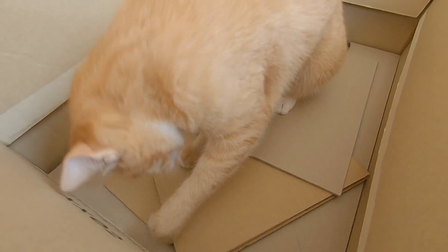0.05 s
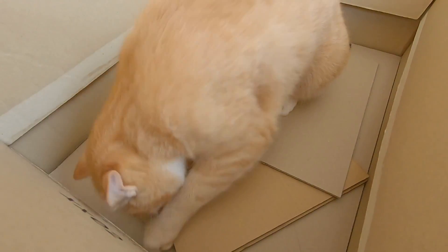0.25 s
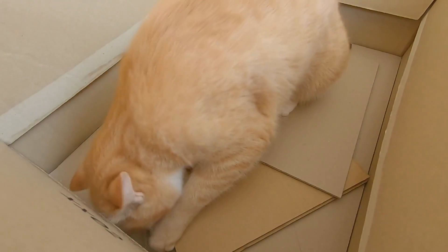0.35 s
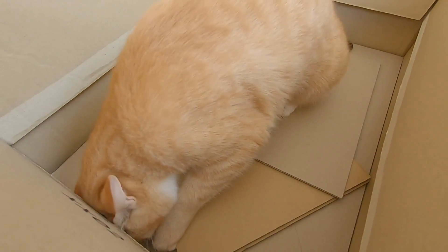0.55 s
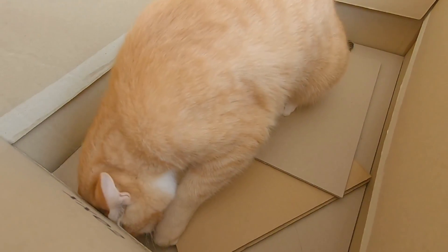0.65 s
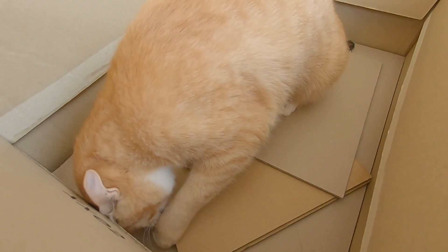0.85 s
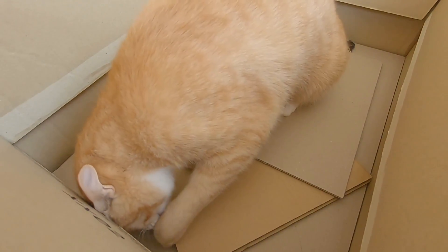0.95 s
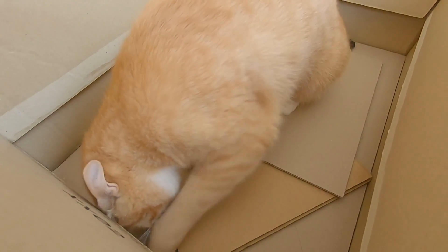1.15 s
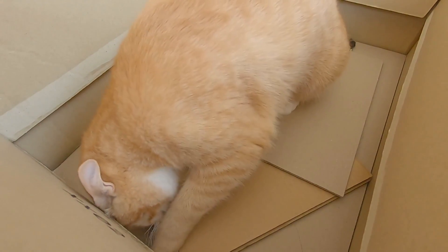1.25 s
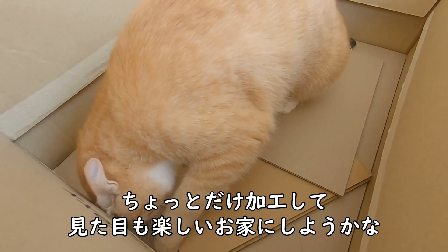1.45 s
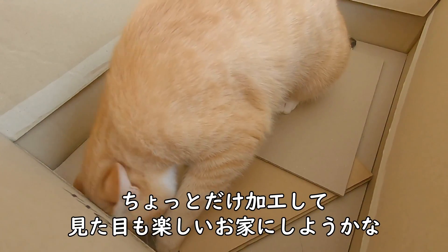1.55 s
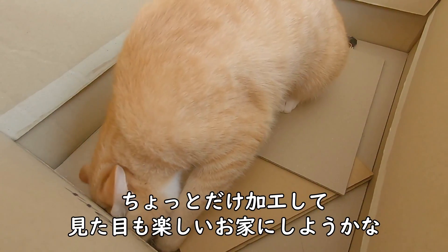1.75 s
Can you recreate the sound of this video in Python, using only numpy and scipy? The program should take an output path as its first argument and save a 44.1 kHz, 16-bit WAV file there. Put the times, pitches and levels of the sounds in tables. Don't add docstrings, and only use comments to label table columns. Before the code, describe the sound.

Cat claws and paws knock on loose cardboard in a box, close and dry with a short room tail. Faint low hum and murmur open; at 0.2 s a loud crisp clack lands with a deep soft thump and brief scuff. Small taps follow at 0.43 and 0.8 s, firmer clicks at 1.02 to 1.13 s, a softer knock at 1.34 s, then faint ticks and soft fur brushing until 1.8 s.

```python
import sys
import numpy as np
from scipy import signal
from scipy.fft import rfft, irfft, next_fast_len
from scipy.io import wavfile

SR = 44100
rng = np.random.default_rng(int(sys.argv[2]) if len(sys.argv) > 2 else 0)


def voltage_ratio(level):
    return 10 ** (np.asarray(level, float) / 20)


def unload_audio(sound):
    columns = np.transpose(np.atleast_2d(sound))
    steps = np.round(np.clip(columns, -1, 1) * 32767)
    wavfile.write(sys.argv[1], SR, steps.astype(np.int16))


N = 79380

# time_s, housing_shake_db, upper_order_buzz_db
MOTOR_CURVE = [(0, -47, -68), (.055, -83, -52), (.09, -56, -59), (.14, -49.5, -55.5), (.2, -59.5, -59.5),
               (.5, -65.5, -70.5), (.9, -91.5, -70.5), (1.15, -52.5, -66.5), (1.38, -71, -67),
               (1.56, -58.5, -59), (1.66, -49.5, -68.5), (1.8, -52.5, -59)]
# multiple, level_db
MOTOR_ORDERS = [(1, -9), (2, -0.5), (3, -3), (4, -8), (5, -15), (6, -9.5), (7, -7), (8, -9), (9, -16)]
# frequency_hz, density_db (per Hz)
MURMUR_COLOUR = [(20, 5), (45, 2), (70, -8), (200, -2), (400, -14), (830, -12), (1100, -26), (3000, -40)]
# time_s, level_db
MURMUR_CURVE = [(0.0, -62.5), (0.15, -64), (0.23, -54.5), (0.52, -63.5), (0.802, -61.5), (0.952, -60.5),
                (1.342, -61.5), (1.568, -58), (1.8, -57)]
# time_s, level_db
FUR_CURVE = [(0, -68.5), (.03, -90.5), (.12, -80), (.33, -87.5), (.45, -89), (.58, -71), (.67, -75),
             (.715, -81), (.8, -70), (.95, -73), (1.25, -78.5), (1.44, -77.5), (1.6, -78), (1.675, -70.5),
             (1.72, -68.5), (1.77, -59), (1.8, -69.5)]
# frequency_hz, density_db (per Hz)
FUR_SPECTRUM = [(900, -13), (1500, -8.5), (3000, -11.5), (4600, -5.5), (6500, -5.5), (9000, -18),
                (12300, -14.5), (15500, -28.5)]
# start_s, peak_db, centre_hz, spread_octaves, ring_t60_s
FURTHER_CLAW_TAPS = [(.1828, -49.5, 3300, 0.54, 0.026), (.111, -62, 5040, 1.2, 0.0063),
                     (.148, -58, 1300, 0.88, .03), (.2039, -20, 5140, 0.23, 0.022), (.207, -24, 4910, 0.26, 0.015),
                     (.2255, -40.5, 4000, 1.3, .02), (.231, -43, 3500, 1.3, .02), (.254, -42.5, 2500, 1.6, .025),
                     (.389, -63, 4000, 1.5, 0.019), (.4154, -57.5, 4500, 0.61, 0.018),
                     (.482, -57, 2000, 0.47, 0.017), (.623, -52, 3000, 1, 0.0081), (.8555, -41.5, 2600, .2, .015),
                     (.797, -37, 4600, 0.21, .015), (.867, -45, 3000, 1.2, 0.012), (.932, -49, 1400, 0.33, 0.013),
                     (.9735, -52, 1750, .2, 0.022), (.976, -56, 6550, .2, 0.014), (1.0205, -34.5, 2500, .2, .012),
                     (1.0213, -36.5, 7160, 0.67, .008), (1.0935, -39, 2500, 0.23, .015),
                     (1.0932, -50, 11000, .4, .008), (1.111, -36, 500, 0.18, 0.068),
                     (1.1258, -26.5, 10000, 0.65, 0.0042), (1.1385, -31, 3500, 0.31, 0.0098),
                     (1.147, -40.5, 3300, .45, 0.011), (1.1655, -55.5, 3400, 0.27, .015),
                     (1.34, -38, 3200, .6, .02), (1.3402, -53, 8500, .4, .012), (1.381, -52.5, 2800, 0.6, 0.012),
                     (1.531, -55, 2000, 0.41, .012), (1.775, -50, 6000, 0.99, .008)]
# start_s, peak_db, centre_hz, spread_octaves, ring_t60_s
CLAW_TAPS = [(.1932, -36, 3250, 0.39, 0.012), (0.2037, -11.5, 2580, 0.6, 0.036),
             (.2046, -19, 768, 0.084, 0.035), (.2066, -11, 3450, 0.27, 0.011),
             (.2083, -17.5, 1333, 1.6, 0.021), (.4295, -38, 2150, 0.73, 0.04),
             (.795, -31, 2440, 1.26, 0.031), (.7985, -54, 2500, 1.3, 0.022), (.850, -51, 1700, 0.16, 0.032),
             (.853, -44, 4370, .3, 0.015), (.942, -42, 2450, 1.23, 0.03), (.951, -42.5, 4200, 0.36, 0.021),
             (1.0185, -34.5, 1290, 0.13, 0.025), (1.021, -36.5, 4400, 0.13, 0.0082),
             (1.0218, -34, 1190, 0.21, 0.044), (1.031, -37.5, 1260, 1.57, 0.026),
             (1.0925, -30.5, 1210, 1.1, 0.044), (1.1108, -18, 1188, 0.27, 0.024),
             (1.1109, -17, 6300, 0.48, 0.0078), (1.1255, -14, 3590, 0.36, 0.019),
             (1.3395, -29, 1870, 0.94, 0.034), (1.3408, -30.5, 615, 0.48, 0.052),
             (1.477, -51, 1824, 1.1, 0.033), (1.7335, -44, 1924, 0.65, 0.016)]
# start_s, length_s, rms_db, centre_hz, spread_octaves
CLAW_SCUFFS = [(0.144, 0.054, -72.5, 1570, 1), (0.211, 0.083, -49, 2190, 0.83),
               (0.214, 0.045, -53, 3040, 1.8), (0.393, 0.039, -71.5, 2500, 1.6),
               (0.422, 0.05, -63.5, 2037, 1.75), (0.465, 0.07, -59, 2374, 0.88),
               (0.574, 0.17, -71.5, 2210, 1.26), (0.736, 0.15, -65.5, 2930, 1.4),
               (0.792, 0.05, -60.5, 2430, 2), (0.833, 0.028, -62.5, 3050, 0.96),
               (0.937, 0.034, -57.5, 1960, 0.87), (1.012, 0.022, -46.5, 1704, 1.4),
               (1.132, 0.017, -47.5, 3250, 0.29), (1.148, 0.043, -62, 3030, 0.88),
               (1.341, 0.094, -62, 2000, 1.23), (1.741, 0.072, -61.5, 1620, 0.68)]
# start_s, level_db, pitch_hz, ring_t60_s, swell_s
PAW_THUMPS = [(0.208, -33.5, 159, 0.11, .003), (0.207, -30.5, 360.6, 0.1, .001),
              (0.214, -34.5, 75.8, 0.21, .01), (0.248, -22.5, 58.6, 0.15, .03),
              (0.321, -29.5, 58.8, 0.14, .02), (.47, -42, 40, 0.19, .02), (0.801, -36, 180.6, 0.098, .003),
              (1.024, -32.5, 154.3, 0.083, .004), (1.114, -26, 154.6, 0.16, .006),
              (1.17, -36, 69.2, 0.17, .015), (1.26, -42, 42.1, 0.13, .02), (1.341, -42, 355, 0.074, .003),
              (1.458, -41, 40.8, 0.16, .02), (1.03, -51.5, 54, .15, .01), (1.64, -65, 45.6, 0.28, 0.025)]
# frequency_hz, likeness (0 to 1)
PORT_LIKENESS = [(40, .55), (120, .9), (400, .85), (1000, .6), (3000, .5), (12000, .2)]
# frequency_hz, left_minus_right_db
ROOM_BALANCE = [(60, 1.5), (180, -0.5), (550, -2), (1650, -0.5), (4970, -2.5), (15000, -0.5)]
# frequency_hz, left_minus_right_db
BOX_BALANCE = [(60, -1), (150, -1.3), (330, -2.6), (700, -6.5), (1300, -7), (2400, -2.5), (4400, -.5),
               (12000, -2)]
# frequency_hz, left_lead_radians
LEFT_LEAD = [(40, .5), (120, .15), (600, .35), (1200, 1.2), (2760, 1.2), (4500, 1.2), (7400, 1.5),
             (12000, 1.5)]

HUM_HZ, HUM_WAVER_DB = 51.74, 3
HUM_WANDER_RAD = 0.88
MURMUR_LIFT_DB = 3.5
CRACK_DB, CRACK_HZ, STRIKE_SPREAD_DB = -29, 9720, 2
SKIRT_DB = -8.5
RING_TILT = 0.4
SCATTER_HALF_TURNS = 0.53
GRAINS_PER_S, GRAIN_SPREAD_DB, SCUFF_T60_S = 2000, 4, 0.029
STROKE_RISE = 0.29
UNSHARED_DB, UNSHARED_HZ = -14, 7500
ROOM_DB, ROOM_T60_S, ROOM_RISE_S = -20.5, 0.2, 0.008
ROOM_LOW_HZ, WALL_CUT_HZ = 200, 2500
ROOM_TREBLE_DB, ROOM_TREBLE_SHARE = -8, 0.62
TOP_CUT_HZ = 16300


def in_time(rows):
    s, *columns = np.transpose(rows)
    return [np.interp(np.arange(N) / SR, s, c) for c in columns]


def at_hz(points, hz):
    table_hz, values = np.transpose(points)
    return np.interp(np.log(hz), np.log(table_hz), values)


def rms_one(x):
    return x / np.sqrt(np.mean(x ** 2) + 1e-20)


def drift(rate_hz):
    r = np.exp(-2 * np.pi * rate_hz * 40 / SR)
    white = rng.standard_normal(N // 40 + 2002)
    slow = signal.lfilter([1], [1, -2 * r, r * r], white)[2000:]
    return np.interp(np.arange(N) / 40, np.arange(len(slow)), rms_one(slow))


def add(out, start_s, x):
    i = int(start_s * SR)
    out[i:i + len(x)] += x[:N - i]


def motor_hum():
    shake_db, buzz_db = in_time(MOTOR_CURVE)
    turn = 2 * np.pi * HUM_HZ * np.arange(N) / SR
    out = np.zeros(N)
    for k, order_db in MOTOR_ORDERS:
        level_db = (shake_db if k < 3 else buzz_db) + order_db
        waver_db = (k != 2) * HUM_WAVER_DB * drift(8.8)
        slip = (k > 2) * HUM_WANDER_RAD * drift(11)
        out += voltage_ratio(level_db + waver_db) * np.cos(k * turn + 0.33 * k * k + slip)
    return np.sqrt(2) * out


def banded_noise(spectrum, patchy_db):
    out = 0
    edges = np.geomspace(spectrum[0][0], min(spectrum[-1][0], 4 * SR // 11), 17)
    white = rng.standard_normal((2, 2, N))
    for k, (low, high) in enumerate(zip(edges, edges[1:])):
        band = signal.butter(2, [low, high], "band", fs=SR, output="sos")
        mid, side = signal.sosfilt(band, white[k % 2])
        hz = np.sqrt(low * high)
        alike = np.clip(at_hz(PORT_LIKENESS, hz), 0, 1)
        flicker_db = patchy_db * (3 + 40 / hz) * drift(16)
        balance_db = at_hz(ROOM_BALANCE, hz) * np.array([[.5], [-.5]])
        gain = voltage_ratio(at_hz(spectrum, hz) + flicker_db + balance_db)
        out = out + gain * (np.sqrt(1 + alike) * mid + np.sqrt(1 - alike) * side * [[1], [-1]])
    return rms_one(out)


def room_murmur():
    level_db = in_time(MURMUR_CURVE)[0] + MURMUR_LIFT_DB
    return voltage_ratio(level_db) * banded_noise(MURMUR_COLOUR, patchy_db=0.5)


def fur_brushing():
    return voltage_ratio(in_time(FUR_CURVE)[0]) * banded_noise(FUR_SPECTRUM, patchy_db=.35)


def ring(clicks, hz, t60):
    r, w = voltage_ratio(-60 / (t60 * SR)), 2 * np.pi * hz / SR
    return signal.lfilter([0, np.sin(w)], [1, -2 * r * np.cos(w), r * r], clicks + 1e-18)


def sheet(clicks, hz, octaves, t60, chance):
    detune, strike, phase = chance
    modes_hz = np.geomspace(220, 13000, 110) * (1 + .012 * detune)
    away = np.log2(modes_hz / hz) / octaves
    t = np.arange(SR // 12) / SR
    skirt = voltage_ratio(SKIRT_DB) * min(2 * octaves, 1) * (away < 0) * np.sqrt(modes_hz / hz)
    weights = (np.exp(-.5 * away ** 2) + skirt) * voltage_ratio(STRIKE_SPREAD_DB * strike)
    modes_t60 = t60 * (hz / modes_hz[:, None]) ** RING_TILT
    angle = 2 * np.pi * modes_hz[:, None] * t + np.pi * SCATTER_HALF_TURNS * phase[:, None]
    body = weights @ (voltage_ratio(-60 * t / modes_t60) * np.sin(angle))
    body = body * (1 - np.exp(-t / 0.000086)) / np.sqrt(np.sum(weights ** 2))
    crack = voltage_ratio(CRACK_DB) * hz / 2000 * ring(clicks, CRACK_HZ, .0017)
    return signal.fftconvolve(clicks, body)[:len(clicks)] + crack


def claw_contacts(table):
    out, click = np.zeros(N), np.zeros(SR // 8)
    click[0] = 1
    chances = rng.standard_normal((len(table), 3, 110))
    for (start_s, peak_db, hz, octaves, t60), chance in zip(table, chances):
        tap = sheet(click, hz, octaves, t60, chance)
        add(out, start_s, voltage_ratio(peak_db) * tap / np.abs(tap).max())
    return out


def claw_scuffs():
    out = np.zeros(N)
    hits = rng.random(N) < GRAINS_PER_S / SR
    sizes = voltage_ratio(GRAIN_SPREAD_DB * np.minimum(rng.exponential(1, N), 4))
    grains = hits * sizes * rng.choice([-1, 1], N)
    t = np.arange(SR // 4) / SR
    chances = rng.standard_normal((len(CLAW_SCUFFS), 3, 110))
    for (start_s, length_s, rms_db, hz, octaves), chance in zip(CLAW_SCUFFS, chances):
        progress = t / (STROKE_RISE * length_s)
        stroke = (progress * np.exp(1 - progress)) ** 1.2
        drag = np.resize(grains[int(start_s * SR):], len(t)) * stroke
        x = sheet(drag, hz, octaves, SCUFF_T60_S, chance)
        add(out, start_s, voltage_ratio(rms_db) * rms_one(x) * np.sqrt(length_s / t[-1]))
    return out


def paw_thumps():
    out, t = np.zeros(N), np.arange(SR // 2) / SR
    for start_s, level_db, hz, t60, swell_s in PAW_THUMPS:
        swell = 1 - np.exp(-(t / swell_s) ** 2)
        add(out, start_s, voltage_ratio(level_db - 60 * t / t60) * swell * np.sin(2 * np.pi * hz * t))
    return out


def microphone_ports(x):
    size = next_fast_len(N + 4096)
    hz = np.maximum(np.arange(size // 2 + 1) * SR / size, 1)
    half = voltage_ratio(at_hz(BOX_BALANCE, hz) / 2) * np.exp(.5j * at_hz(LEFT_LEAD, hz))
    return irfft(rfft(x, size) * np.array([half, 1 / half]), size)[:, :N]


def room_tail(x):
    t = np.arange(SR // 2) / SR
    low, treble = rng.standard_normal((2, 2, len(t))) * (1 - np.exp(-(t / ROOM_RISE_S) ** 2))
    walls = signal.butter(1, [ROOM_LOW_HZ, WALL_CUT_HZ], "band", fs=SR, output="sos")
    dull = signal.sosfilt(walls, low) * voltage_ratio(-60 * t / ROOM_T60_S)
    bright = voltage_ratio(ROOM_TREBLE_DB) * treble * voltage_ratio(-60 * t / (ROOM_TREBLE_SHARE * ROOM_T60_S))
    tail = dull + .3 * dull[::-1] + bright
    tail = tail / np.sqrt(np.sum(tail ** 2) / 2)
    return voltage_ratio(ROOM_DB) * signal.fftconvolve(x[None], tail, axes=1)[:, :N]


def scene():
    hum = motor_hum()
    background = room_murmur() + fur_brushing()
    claws = claw_contacts(FURTHER_CLAW_TAPS) + claw_contacts(CLAW_TAPS) + claw_scuffs()
    claws = signal.sosfilt(signal.butter(2, 160, "high", fs=SR, output="sos"), claws)
    treble = signal.sosfilt(signal.butter(2, UNSHARED_HZ, "high", fs=SR, output="sos"), claws)
    unshared = voltage_ratio(UNSHARED_DB) * drift(25) * treble * [[1], [-1]]
    direct = microphone_ports(claws + paw_thumps() + hum)
    return direct + unshared + room_tail(claws) + background


def band_limit(x):
    return signal.sosfilt(signal.butter(12, 16370, fs=SR, output="sos"), x)


def record(dry):
    top_cut = signal.cheby2(10, 60, TOP_CUT_HZ, fs=SR, output="sos")
    mix = signal.sosfilt(top_cut, dry)
    return band_limit(mix)


dry = scene()
out = record(dry)
unload_audio(out)
```